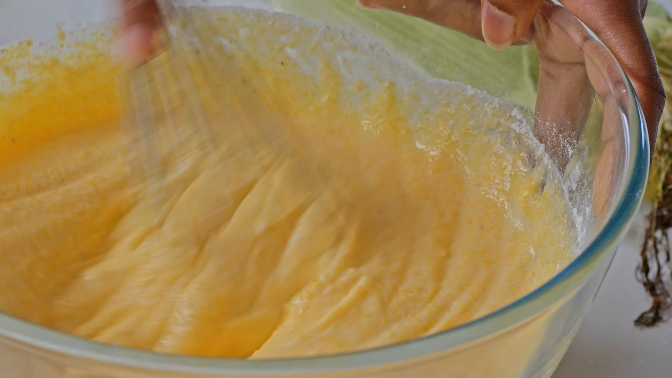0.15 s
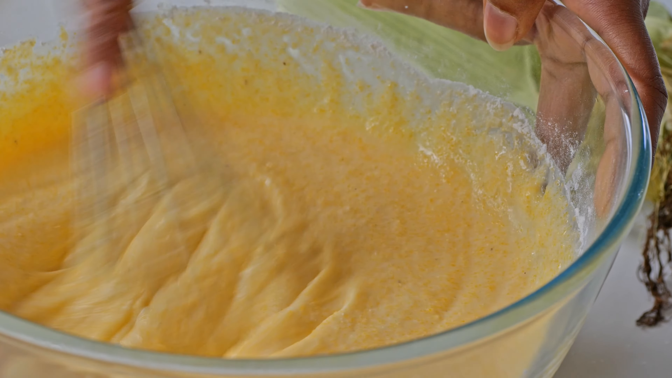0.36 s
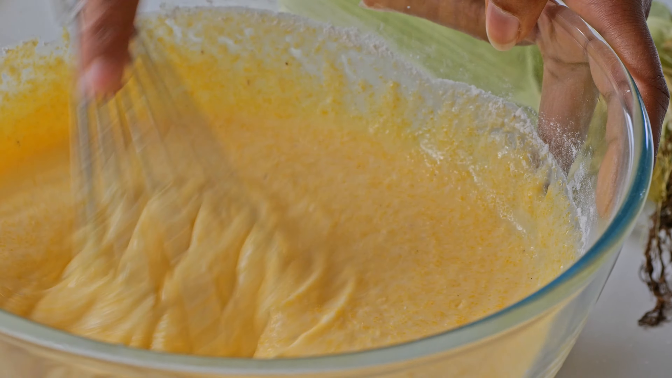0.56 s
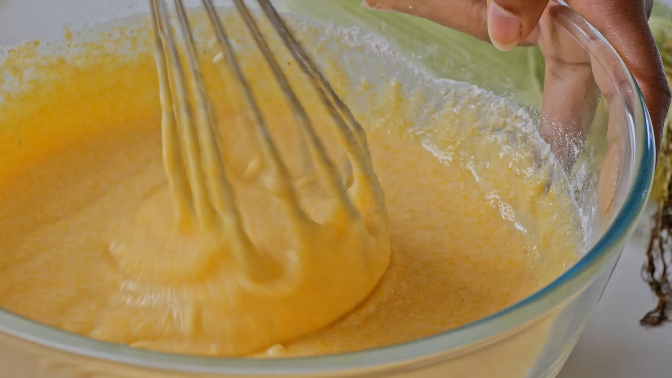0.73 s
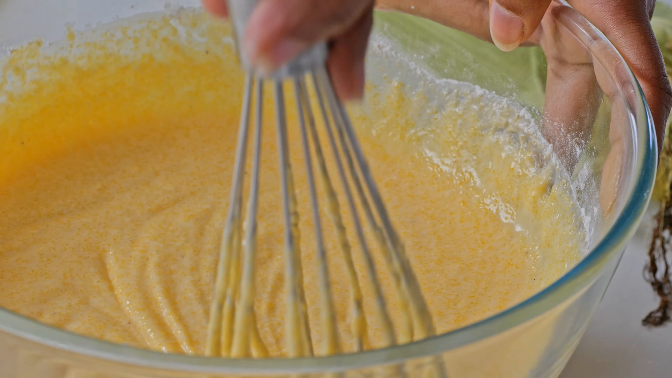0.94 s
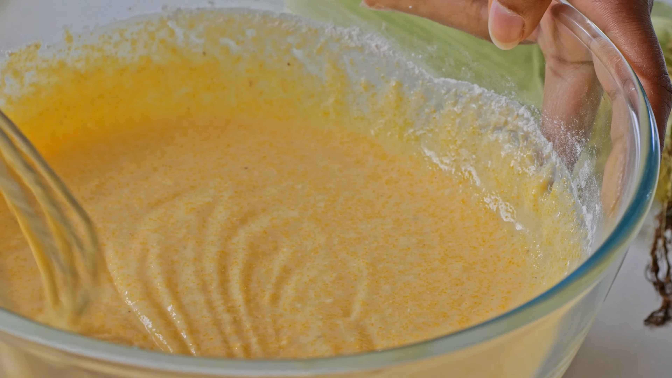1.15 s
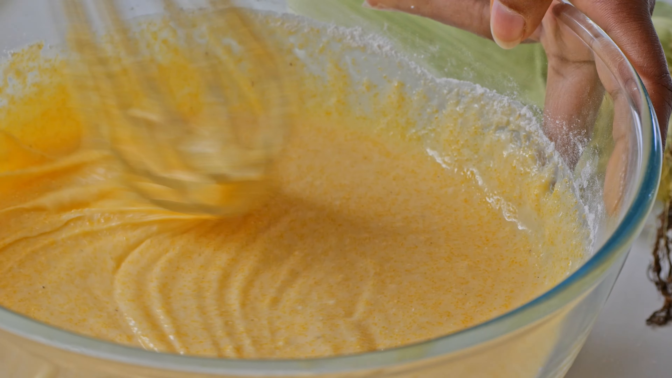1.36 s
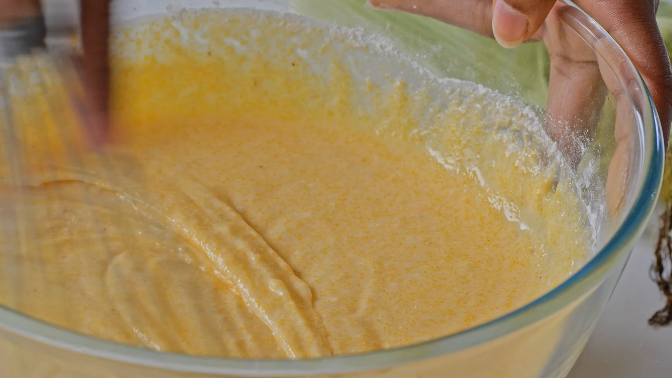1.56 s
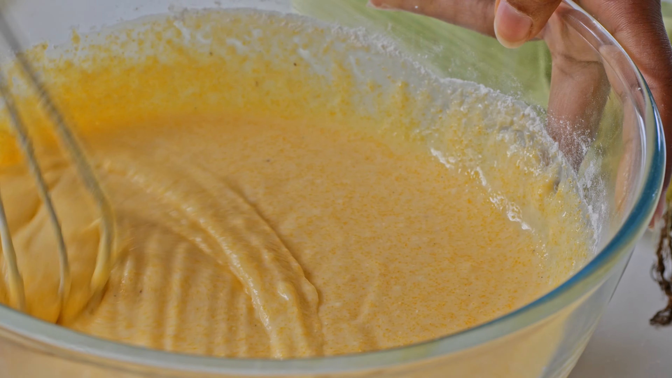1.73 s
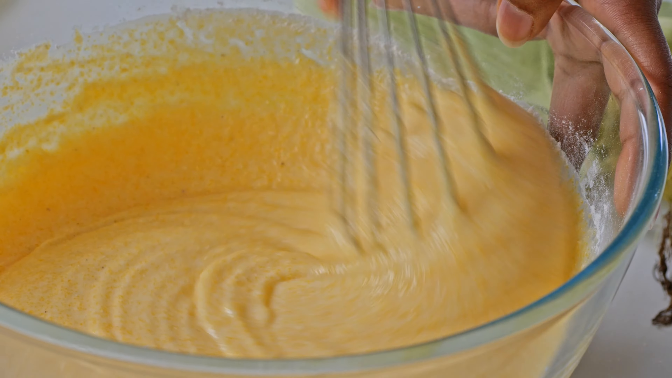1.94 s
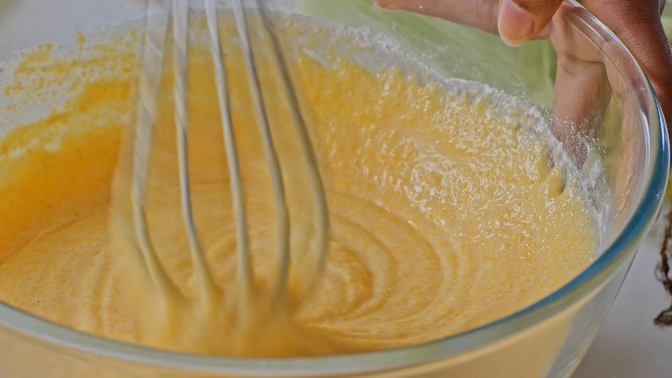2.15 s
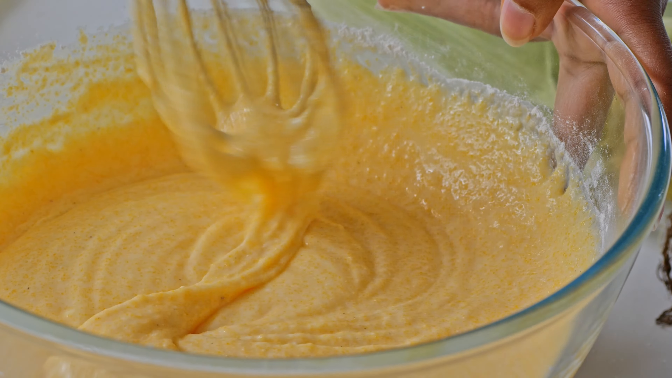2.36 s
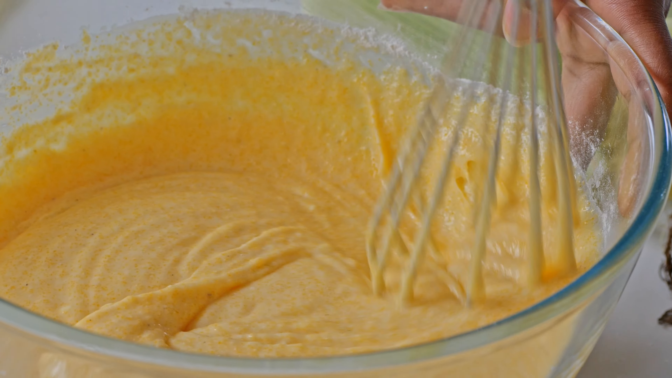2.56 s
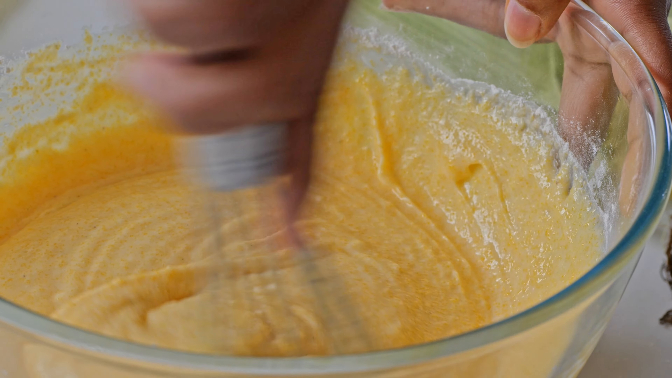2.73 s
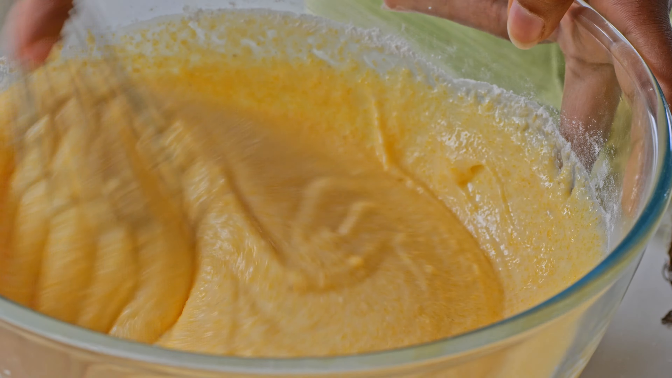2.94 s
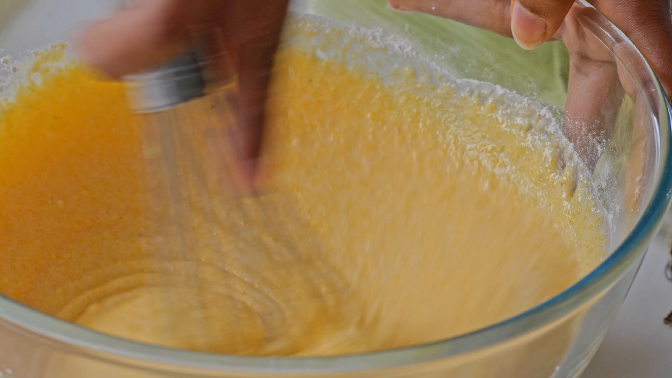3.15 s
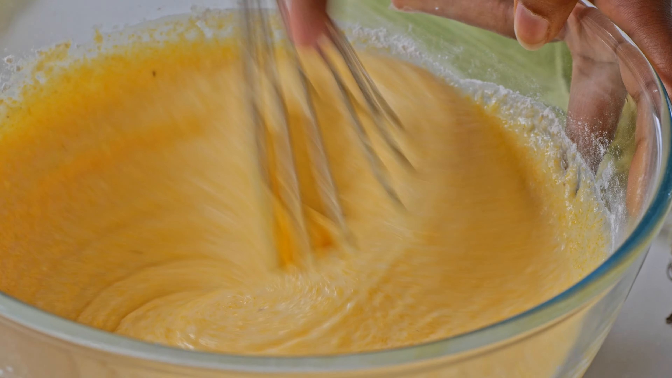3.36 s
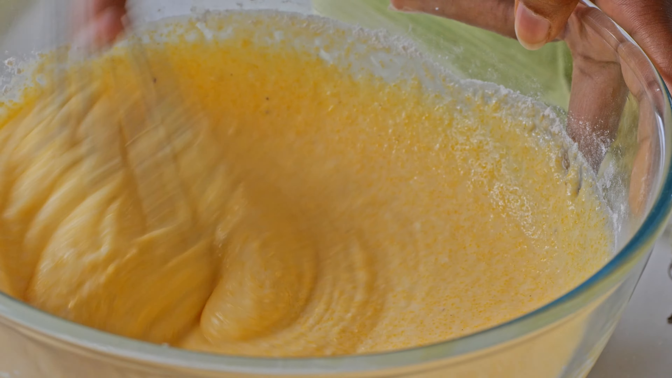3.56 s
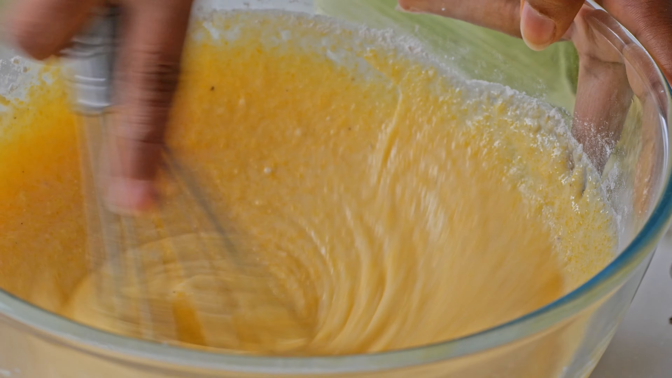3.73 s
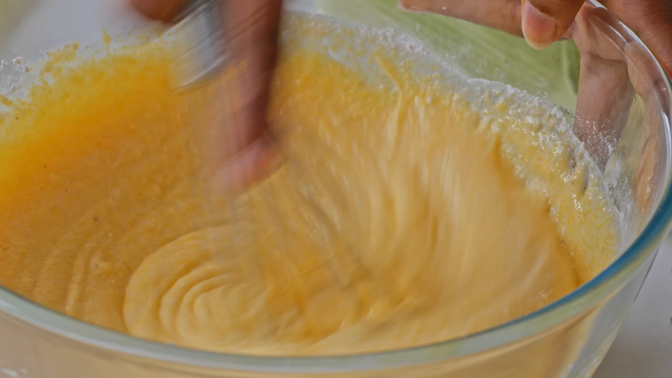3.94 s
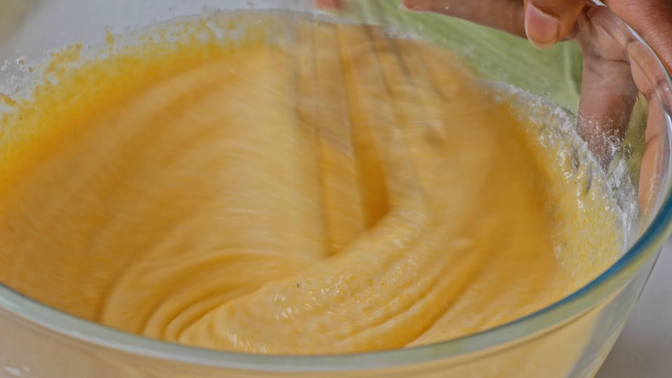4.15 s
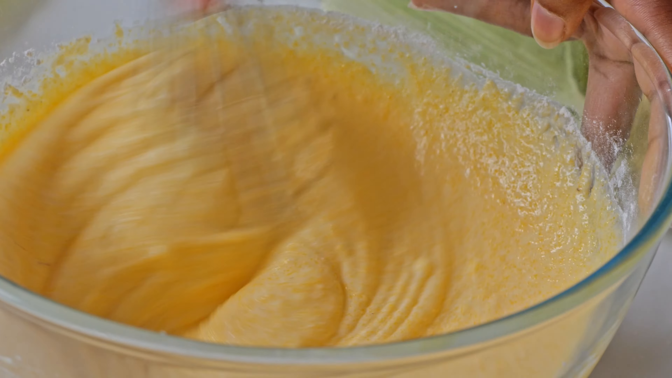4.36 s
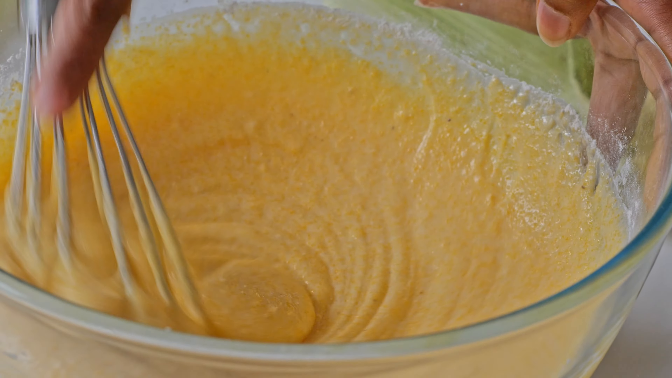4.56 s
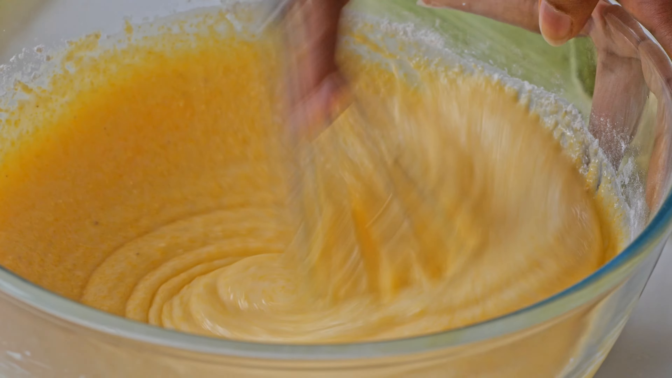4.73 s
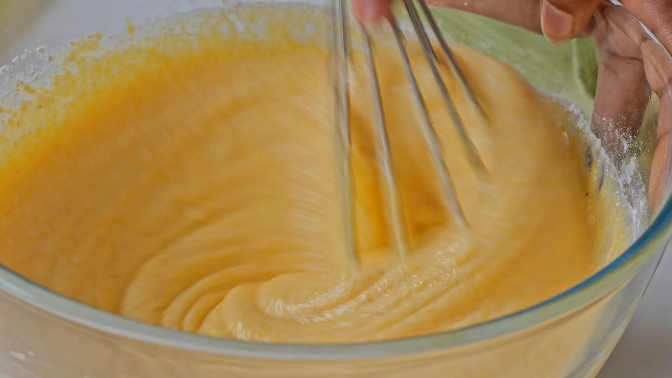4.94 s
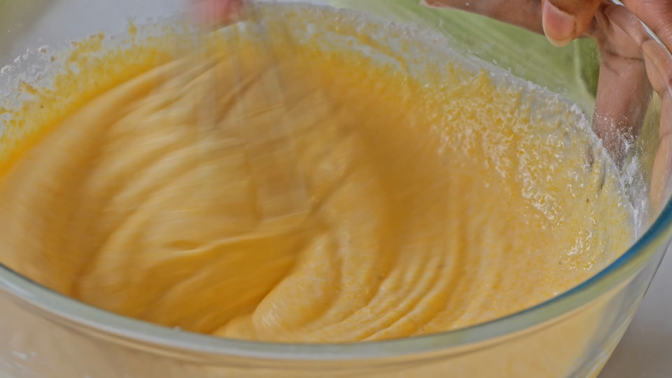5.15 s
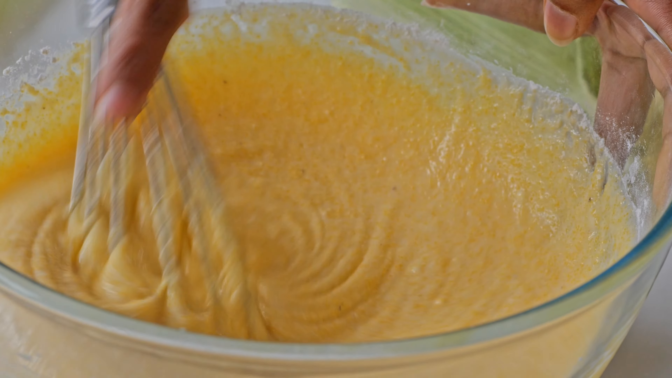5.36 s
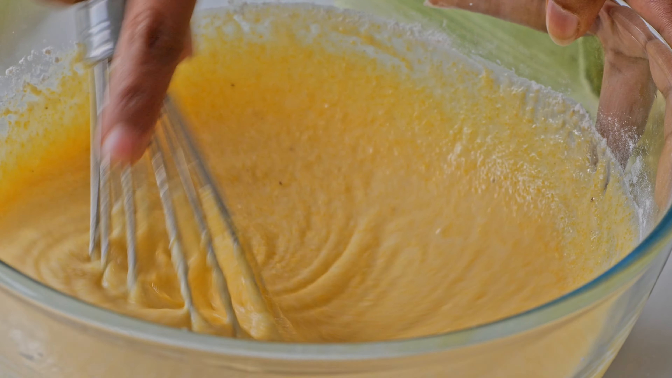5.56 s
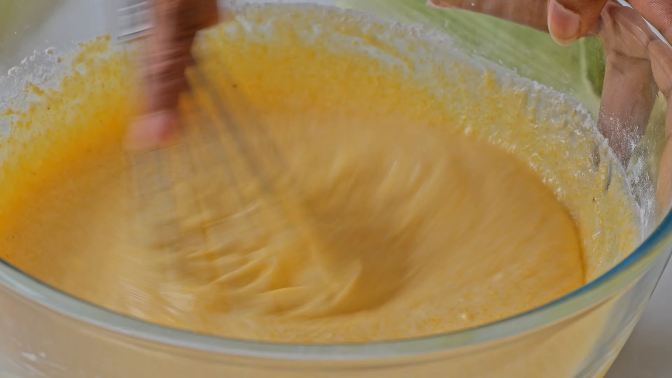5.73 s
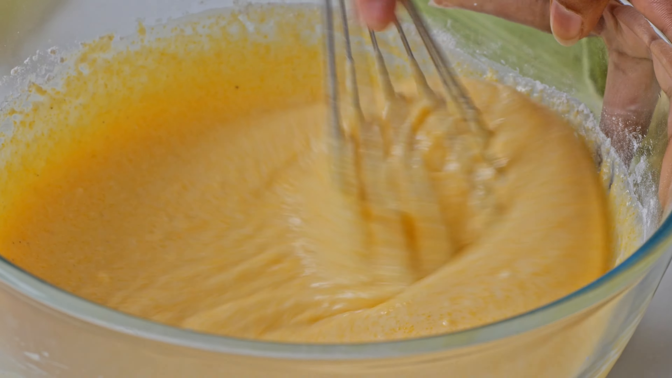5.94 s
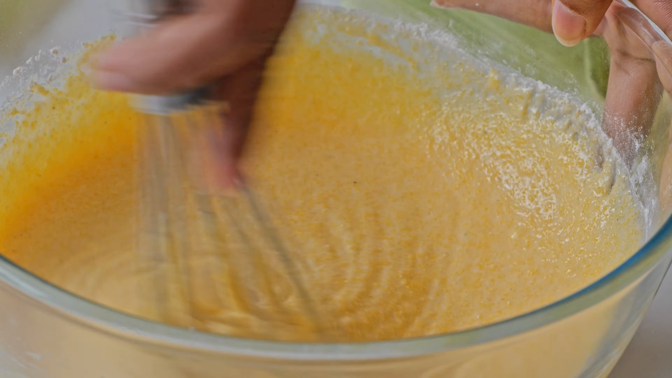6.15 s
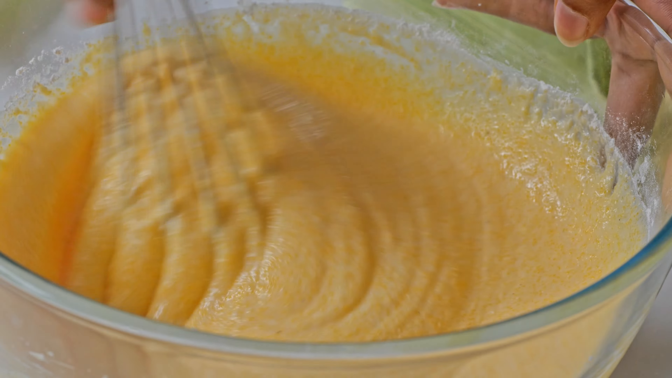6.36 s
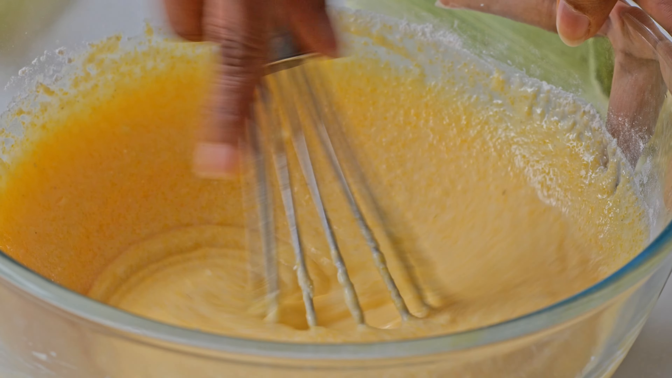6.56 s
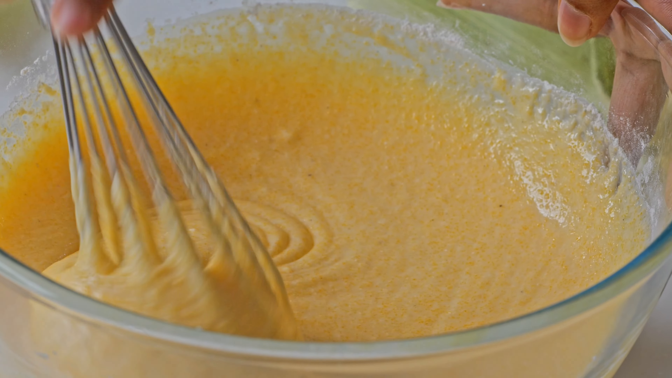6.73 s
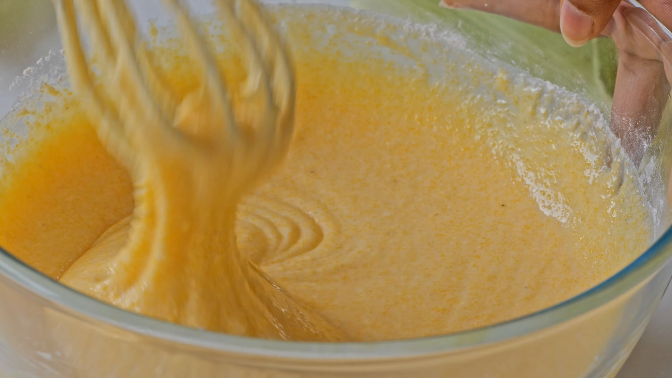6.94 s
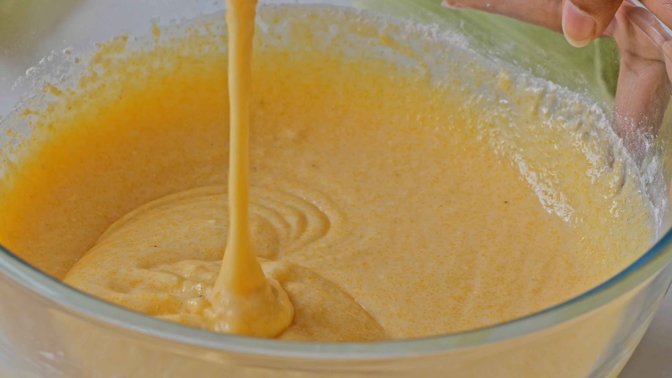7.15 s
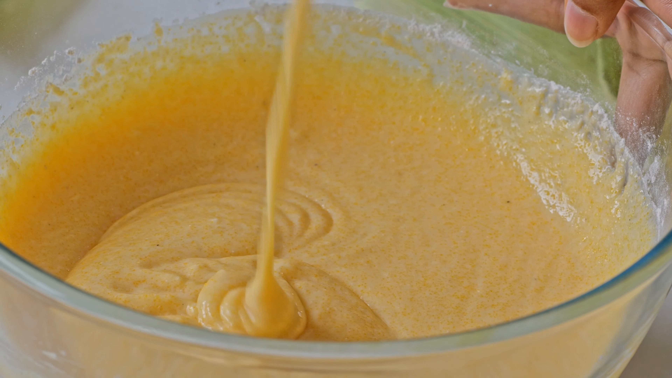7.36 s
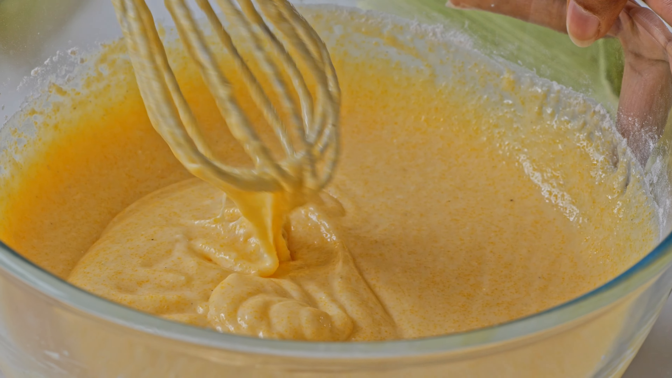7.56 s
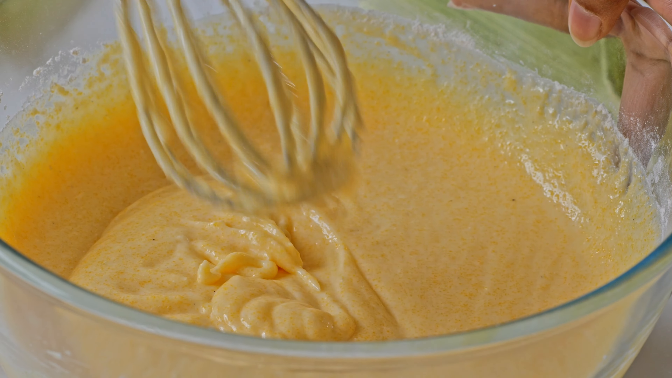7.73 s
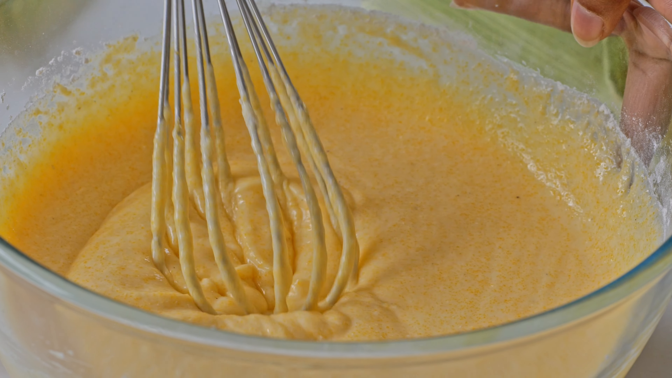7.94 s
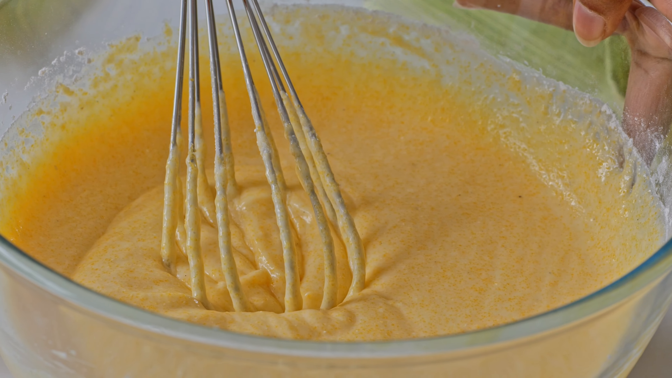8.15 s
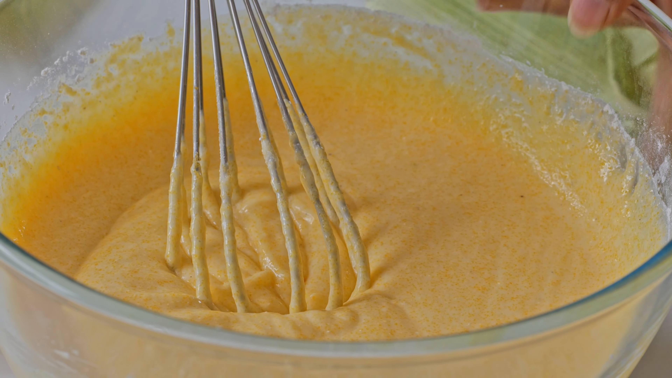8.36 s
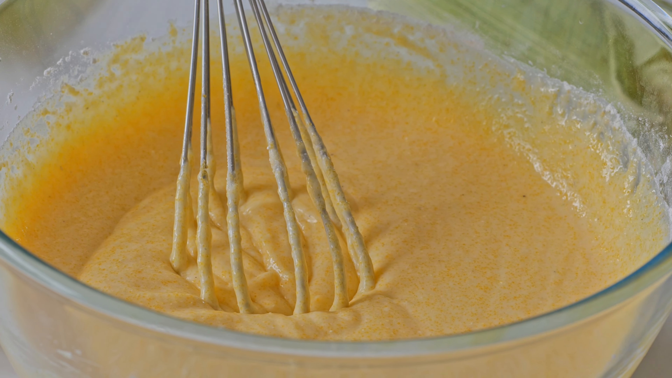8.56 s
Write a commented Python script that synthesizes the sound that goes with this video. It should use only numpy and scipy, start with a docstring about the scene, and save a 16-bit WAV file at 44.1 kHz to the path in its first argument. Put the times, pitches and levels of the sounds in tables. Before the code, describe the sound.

A wire whisk stirs thick batter softly in a glass bowl, close by, over the low hush of a slightly echoing kitchen. There are scattered dull bumps and light clinks, with a sharper knock and scrape on the glass at about 1.6 seconds. Around 3 seconds the churning gets wetter and stronger. From 3.5 to 6 seconds the whisk beats steadily, nearly four strokes a second: wires knock, skid and tick while the batter plops, squelches and crackles stickily, loudest just before 6 seconds. The whisk then slows to soft stirring with a couple of bumps near 6.5 seconds. Wires snap together with a plop at 7.5 seconds, and a knock with a slight clink follows at 8. Fingers brush softly off the rim at about 8.5 seconds. From about 4.5 seconds on, a distant bird whistles and chirps very faintly.

```python
"""Thick batter churns softly over the hush of a bare, echoing kitchen, stirred with a wire whisk.
The whisk knocks through it on a hand-held glass bowl; its wires skid on the wall, clink on bare glass
and snap together. The stirring grows into steady beating: bubbles squelch, air pockets plop, sticky
batter peels away and caught wires tick free. A faint bird whistles and chirps in the distance.
The whisk slows again, and at the end fingers slide off the rim."""
import sys
import numpy as np
from scipy import signal
from scipy.fft import rfft, irfft, next_fast_len
from scipy.io import wavfile
from scipy.ndimage import map_coordinates

SR = 44100
rng = np.random.default_rng(int(sys.argv[2]) if len(sys.argv) > 2 else 0)


def put_to_file(sound):
    """Save the sound as 16-bit audio at rate SR, in the file named by the first command-line argument."""
    columns = np.atleast_2d(sound).T  # one column per channel
    safe = np.clip(columns, -1, 1)
    whole_steps = np.round(safe * 32767)
    wavfile.write(sys.argv[1], SR, whole_steps.astype(np.int16))


N = 379260

# how long the kitchen echoes (t60 is the time to fade by 60 dB): f/Hz, t60/s
ECHO_TIMES = [(120, 0.19), (400, 0.83), (1000, 0.65), (3000, 0.61), (8000, 0.51), (15000, 0.11)]
# how much left and right differ: f/Hz, side level/dB
STEREO_WIDTH = [(30, -5), (70, -31), (170, -95), (300, -29.5), (650, -13.5), (1400, -4.5), (2800, -4.5),
                (6000, -7.5), (10000, -13.5), (14000, -0.5)]
# tone of the quiet room: f/Hz, level/dB
HUSH_TONE = [(15, -67), (25, -43.5), (141, -11), (291, -11), (324, -3), (527, -12.5), (587, 0.5),
             (637, -11), (1120, -16), (1220, -15.5), (1780, -22), (5370, -27), (6850, -26), (9720, -25.5),
             (15800, -36.5)]
# how hard the batter is stirred: t/s, churn level/dB, fizz level/dB
STIRRING = [(0.0, -60.5, -88), (1.0, -76, -70), (1.09, -64, -62.5), (1.24, -59.5, -55), (1.4, -74, -81),
            (1.8, -62.5, -57.5), (2.2, -66, -76), (2.99, -59.5, -61), (3.07, -48, -54.5),
            (3.22, -53.5, -62), (3.5, -52, -59.5), (4.55, -45.5, -58.5), (5.299, -49, -61.5),
            (5.55, -46, -52.5), (5.85, -39.5, -60), (6.2, -58, -63.5), (6.55, -61.5, -60), (6.9, -65, -78),
            (8.25, -59, -67), (8.6, -63, -76)]
# tone of folding batter: f/Hz, level/dB
CHURN_TONE = [(29, -54), (50, -43), (140, 0.5), (209, -0.5), (376, 2), (542, -12), (594, 0), (906, -8),
              (1790, -18), (2030, -18), (2180, -20.5), (4000, -33.5), (5200, -29), (8800, -120)]
# tone of tiny bubbles tearing open: f/Hz, level/dB
FIZZ_TONE = [(1180, -19), (2000, -1.5), (2800, -4.5), (3140, -3), (5950, -3), (11400, -0.5), (14400, -4),
             (15800, -21)]
# pitches at which the full bowl rings: f/Hz, width/Hz, level/dB
BOWL_PEAKS = [(253, 16, 0.5), (440, 13, 0.5), (686, 15, -5), (777, 44, -3), (1160, 260, -0.5)]
# tone of a cushioned bump: f/Hz, level/dB
THUD_TONE = [(24, -104), (40, -48), (134, 3.5), (203, -6), (237, -3), (304, -8), (433, -5), (538, -9),
             (832, -11.5), (951, -6.5), (1400, -23), (1860, -27), (2200, -31), (2860, -79), (4840, -120)]
# single bumps before and after the beating: t/s, level/dB, low thump/dB, hard clack/dB, gulp f/Hz
BUMPS = [(1.002, -47.5, -10, -7, 354), (1.564, -34.5, 10, 12, 910), (1.958, -50, -11, 3.5, 675),
         (2.506, -43.5, -2.5, 1, 318), (3.012, -45.5, -4, -9, 333), (3.145, -37, -2.5, -11, 424),
         (6.467, -44, -14, -8.5, 810), (6.572, -47, -9, 0, 368), (7.49, -37, -16, -4.5, 603),
         (8.007, -29, -6.5, -2.5, 700)]
# the beating whisk hits the bowl once a turn: t/s, level/dB, low thump/dB, hard clack/dB, gulp f/Hz
STROKES = [(3.512, -30.5, -3, -3.5, 570), (3.758, -33.5, 5, -10, 450), (4.032, -35.5, -3, 0.5, 578),
           (4.299, -32, 4.5, -3.5, 157), (4.568, -26, 3.5, -5, 340), (4.821, -40, 3, -13, 613),
           (5.103, -32.5, 7, -2.5, 607), (5.343, -27, -22, -3, 950), (5.577, -24, -25, -8, 997),
           (5.813, -22, -26, -2.5, 940)]
# wires skid on the wall: t/s, level/dB, treble/dB, zing f/Hz, length/s
SKIDS = [(1.004, -53.5, 1, 4600, 0.011), (1.5647, -33, -2.5, 4900, 0.013), (1.974, -52, -2, 7500, 0.023),
         (2.504, -52, -5, 9250, 0.015), (3.513, -36.5, 13, 10000, 0.0093), (3.546, -35.5, 6, 9700, 0.0074),
         (3.763, -43, 7, 11300, 0.011), (3.779, -37.5, 1, 9600, .01), (5.101, -43.5, 2, 9900, 0.012),
         (5.313, -39.5, 0, 3550, 0.012), (5.337, -30, -2, 10800, .02), (5.432, -35, 3, 8900, 0.031),
         (5.553, -36, -8, 11900, .022), (5.575, -24.5, 0.5, 3440, .021), (5.687, -30, 1.5, 5030, 0.023),
         (5.785, -30.5, -3, 12900, 0.036), (5.802, -24, -4, 3200, 0.018), (5.815, -24.5, -3.5, 3370, 0.014),
         (5.906, -37.5, 6, 3430, .024)]
# tone of steel sliding on glass: f/Hz, level/dB
RASP_TONE = [(710, -21.5), (1200, 6), (1470, -12), (1830, -7), (2470, -13.5), (3340, -11.5), (5260, -7.5),
             (6670, -9.5), (7750, -10), (12600, -4), (15800, -11.5)]
# pitches at which the wire loops ring: f/Hz, width/Hz, level/dB
WIRE_PEAKS = [(1845, 58, 2), (3230, 370, -2.5), (3720, 84, 2), (5220, 640, 0.5), (7840, 650, 3.5),
              (9850, 410, 0), (12260, 300, 0.5), (13800, 150, -7)]
# a wire hits bare glass: t/s, level/dB, low tones/dB, hardness/dB, chime near 4.8 kHz/dB
CLINKS = [(1.008, -63.5, -12, -14, -4), (1.204, -61, 0, 10, 6), (1.237, -66, 2, 4, -2),
          (1.567, -34, -1, -0.5, -2), (1.89, -59.5, 4, 5, -9), (8.006, -46.5, -7.5, -8, -26)]
# tones of the freely ringing bowl: f/Hz, level/dB, t60/s
GLASS_MODES = [(367, -2, 0.049), (957, -6.5, 0.061), (1590, 3.5, 0.045), (1805, -7, 0.062),
               (2286, -2, 0.021), (2510, 1.5, 0.04), (3500, -2, 0.033), (3583, 0, 0.048), (4790, 3, 0.034),
               (4840, -1, 0.022), (6240, -8, 0.048), (7780, -5, 0.02), (9420, -9, 0.027),
               (9430, -10, 0.046)]
# two wires snap together: t/s, level/dB
SNAPS = [(2.5055, -42.5), (3.514, -49), (3.76, -40), (5.106, -34.5), (7.4916, -27), (7.891, -46),
         (8.064, -51)]
# batter squeezes through the wires: t/s, level/dB, f/Hz, rise/s
SQUELCHES = [(2.985, -57, 1690, 0.0071), (3.032, -53, 1500, 0.0049), (3.149, -40.5, 950, 0.0042),
             (3.19, -47.5, 920, 0.0077), (3.502, -42, 1020, 0.0046), (3.369, -51, 1650, 0.0075),
             (3.4, -58, 1800, 0.026), (3.547, -37.5, 1030, .005), (3.657, -43, 1740, .003),
             (3.78, -44, 1090, 0.0035), (3.912, -50, 1700, 0.0064), (4.435, -46.5, 1610, .02),
             (4.968, -40, 1420, 0.0029), (6.465, -42, 880, 0.0074)]
# air pockets close behind the wires: t/s, level/dB, f/Hz, low thump/dB
PLOPS = [(3.036, -45.5, 300, 0), (3.26, -50, 394, -2), (3.372, -46, 323, -4), (3.46, -39.5, 290, 2),
         (3.501, -35.5, 578, -1), (3.59, -34.5, 368, -9), (3.657, -41, 344, -22), (3.789, -32, 436, -7.5),
         (3.916, -36, 884, -9), (3.97, -34.5, 350, 2), (4.062, -37.5, 380, 5), (4.177, -56, 247, 0),
         (4.329, -37, 332, 7), (4.393, -43, 367, -7), (4.451, -40, 344, -7), (4.623, -34, 800, -10),
         (4.713, -42.5, 482, -13), (4.769, -37.5, 343, -4), (4.971, -35, 314, -10.5),
         (5.029, -39, 584, -14), (5.131, -44, 377, 3), (5.232, -36.5, 340, -22), (5.283, -36.5, 380, -10),
         (5.312, -28, 390, -5), (5.451, -40, 940, -17), (5.552, -29, 957, -15), (5.583, -29, 270, -12),
         (5.821, -29.5, 268, -7), (7.495, -41, 267, -8)]
# sticky batter peels off the wires: t/s, level/dB, f/Hz, rise/s
PEELS = [(3.375, -59, 11000, .008), (3.44, -51, 11500, .009), (3.965, -49.5, 9500, 0.0053),
         (4.0, -51.5, 11000, .016), (4.055, -52, 9500, 0.0084), (4.174, -53, 12300, 0.0037),
         (4.286, -50, 10700, 0.0032), (4.506, -48, 12300, 0.0063), (4.622, -46.5, 10500, .004),
         (4.711, -53, 11000, 0.0054), (4.764, -49.5, 11400, 0.0047), (4.825, -55, 12000, 0.0043),
         (4.861, -45, 9400, 0.0037), (4.99, -45, 9000, 0.0058), (5.226, -50, 11200, .005),
         (5.28, -49, 10500, 0.0047), (5.364, -40, 10000, 0.0057), (5.946, -52, 10000, 0.0064),
         (6.1, -51.5, 11100, .005), (6.425, -53, 12000, 0.0042), (6.47, -53, 10000, .008),
         (6.652, -55, 12000, .009)]
# a caught wire springs free: t/s, level/dB, f/Hz
TICKS = [(3.516, -42, 1970), (3.548, -37, 1900), (3.657, -47, 1650), (3.78, -43, 2050), (3.801, -42, 2000),
         (3.909, -47, 1800), (4.036, -49, 2010), (4.064, -43, 2020), (4.109, -49, 2300), (4.179, -54, 2060),
         (4.331, -46.5, 1960), (4.474, -52, 1500), (4.624, -47.5, 1670), (4.714, -41, 1660),
         (4.865, -42.5, 2000), (4.971, -46, 1570), (5.344, -34.5, 1965), (5.58, -32.5, 1960),
         (5.82, -32, 1880)]
# overtones of a damped wire loop: f/Hz, level/dB, t60/s
LOOP_MODES = [(3100, -8, 0.049), (3840, -13.5, 0.039), (5080, -11, 0.031)]
# the bird's plain notes: t/s, length/s, start f/Hz, end f/Hz, level/dB
WHISTLES = [(4.423, 0.06, 2060, 2070, -79), (4.513, 0.11, 2058, 2069, -75.5),
            (4.674, 0.031, 2048, 2050, -68.5), (4.819, 0.097, 2065, 2094, -71.5),
            (5.225, 0.022, 2170, 2410, -72), (5.382, 0.093, 2380, 2220, -71),
            (6.704, 0.107, 2375, 2622, -75.5), (6.77, 0.013, 2340, 1750, -70),
            (8.403, 0.012, 2580, 1610, -69)]
# the bird's run of falling calls: t/s, level/dB, pitch ratio, length ratio
CHIRPS = [(7.015, -80, 0.94, 1.08), (7.305, -80, 1, 0.95), (7.605, -81, 0.95, 0.86),
          (7.9, -73.5, 0.93, 0.8), (8.21, -81, 0.96, 0.81)]
# the pitch of one falling call: t/s, f/Hz
CHIRP_GLIDE = [(0, 3700), (0.016, 3525), (0.03, 3435), (.04, 2666), (.07, 2543), (.08, 2094), (0.1, 1860)]
# the hand slides off the rim: t/s, level/dB
HAND_SLIDE = [(8.4, -83), (8.515, -68), (8.534, -55.5), (8.6, -71)]
# tones of a snap, a squelch, a tick's crack and rubbing skin: f/Hz, level/dB
SNAP_TONE = [(300, -34), (2000, 0), (8000, -4.5), (10500, 8), (15000, 1)]
SQUELCH_TONE = [(200, -21), (900, 5), (2000, -11), (5000, -14.5)]
CRACK_TONE = [(500, -34), (1500, -3), (5000, -6), (14000, -16)]
SKIN_TONE = [(500, -13), (2000, -3), (7000, -4), (11000, -4.5), (15000, -17)]

HUSH_DB, CHURN_DB, FIZZ_DB = -66.17, -10.5, -14
SURGE_DB, BUILD_DB = 3, 3.5  # the churning swells, and builds up towards the next stroke
AFTER_DB, AFTER_T60_S, BEAT_HZ = -14, 0.4, 19  # the glass's weak after-ring and its typical pulse rate
BUBBLE_T60_S, TICK_T60_S, TICK_CRACK_DB = 0.0044, 0.045, -5.5
SLAP_RISE_S, PLOP_T60_S, PLOP_RISE_PER_S = 0.0047, 0.049, 1.7
TOP_HZ = 15850
T = np.arange(SR) / SR  # one second of time, for single sounds


def amp(db):
    """Turn decibels into a gain."""
    return 10 ** (np.asarray(db) / 20)


def unit(x):
    """Scale to an average (rms) level of 1."""
    return x / np.sqrt(np.mean(x ** 2) + 1e-20)


def struck(x, db):
    """Set the average (rms) level of a sound's first 30 ms."""
    return amp(db) * x / np.sqrt(np.mean(x[..., :round(.03 * SR)] ** 2))


def along(points, hz):
    """Read between (Hz, value) points on a logarithmic pitch scale."""
    f, value = np.transpose(points)
    return np.interp(np.log(hz + 1), np.log(f + 1), value)


def add(track, s, x):
    """Mix x into the track at s seconds."""
    start = max(round(s * SR), 0)
    track[..., start:start + x.shape[-1]] += x[..., :N - start]


def coloured(x, gain):
    """Filter x by gain(Hz), so that nothing rings before the sound that causes it."""
    n = x.shape[-1]
    m = 2 * next_fast_len(n // 2 + 4096)
    cepstrum = irfft(np.log(np.maximum(gain(np.fft.rfftfreq(m, 1 / SR)), 1e-6)), m)
    cepstrum[1:m // 2] *= 2  # move the filter's early half to after the sound
    cepstrum[m // 2 + 1:] = 0
    return irfft(rfft(x, m) * np.exp(rfft(cepstrum)), m)[..., :n]


def body(tone, peaks, ring_db, hz):
    """Gain of a broad tone with ringing peaks standing out of it."""
    ring = sum(amp(db) ** 2 / (1 + (2 * (hz - f) / width) ** 2) for f, width, db in peaks)
    return amp(along(tone, hz)) * np.sqrt(1 + amp(ring_db) ** 2 * ring)


def hump(hz, centre_hz, width, height_db):
    """Gain of one extra peak; its width is a share of its frequency."""
    return amp(height_db / (1 + ((hz / centre_hz - 1) / width) ** 2))


def wobble(rate):
    """A smooth curve through rate random points a second."""
    return map_coordinates(rng.standard_normal(int(N * rate / SR) + 4), [np.arange(N) * rate / SR])


def grains(rate, spread_db, size):
    """About rate random clicks a second, some weak and some strong."""
    clicks = (rng.random(size) < rate / SR) * rng.standard_normal(size)
    return clicks * amp(spread_db * np.clip(rng.standard_normal(size), -2, 2))


def stereo(pair):
    """Two unrelated signals become one wide sound, with the bass near the middle."""
    side = coloured(pair[1], lambda hz: amp(along(STEREO_WIDTH, hz)))
    return np.array([pair[0] + side, pair[0] - side])


def kitchen(x, wet_db):
    """The direct sound plus its echo from the hard walls, at the level wet_db."""
    hz, t, noise = signal.stft(rng.standard_normal((2, SR)), SR, nperseg=256)
    fade = amp(-60 * t / along(ECHO_TIMES, hz)[:, None])
    tail = signal.istft(noise * fade, SR, nperseg=256)[1][:, :SR]
    tail = stereo(tail * (1 - np.exp(-T / 0.00043)))
    echo = signal.fftconvolve(x[None], tail / np.linalg.norm(tail[0]), axes=1)[:, :len(x)]
    return x + amp(wet_db) * echo


def hush():
    """Steady room noise, strongest in the low middle."""
    air = coloured(rng.standard_normal((2, N)), lambda hz: amp(along(HUSH_TONE, hz)))
    return amp(HUSH_DB) * unit(stereo(air))


def bubbles(times, spread_db, top_hz, size):
    """Tiny bubbles burst at the given times, each with its own pitch and strength."""
    t = T[:300]
    pitch, strength = rng.random((len(times), 2)).T
    hz = top_hz * (0.04 + 0.96 * pitch[:, None])
    pops = amp(spread_db * strength[:, None] ** 3) * np.sin(2 * np.pi * hz * t)
    pops *= amp(-60 * t / BUBBLE_T60_S)
    at = (times * SR).astype(int)[:, None] + np.arange(len(t))
    return np.bincount(at.ravel(), pops.ravel(), size)[:size]


def surge(t):
    """Level change in dB while beating: two swells a turn, on top of a rise towards its end."""
    starts = np.array(STROKES)[:, 0]
    turn = np.interp(t, starts, np.arange(len(starts))) % 1
    return SURGE_DB * np.sin(2 * np.pi * 2 * turn) + BUILD_DB * turn ** 2


def batter():
    """Folding batter plops in clumps, and small bubbles crackle on its surface."""
    s, churn_db, fizz_db = np.transpose(STIRRING)
    t = np.arange(N) / SR

    def effort(db, floor_db):
        """Gain that follows the stirring and is silent below the floor."""
        return np.sqrt(np.maximum(amp(np.interp(t, s, db)) ** 2 - amp(floor_db) ** 2, 0))

    clumps = amp(2.5 * wobble(25)) * grains(600, 2.15, size=N)
    folds = unit(coloured(clumps, lambda hz: body(CHURN_TONE, BOWL_PEAKS, 1.5, hz)))
    foam = bubbles(rng.uniform(0, N / SR, size=18000), spread_db=12.5, top_hz=15300, size=N)
    foam *= amp(3.3 * wobble(45))
    crackle = unit(coloured(foam, lambda hz: amp(along(FIZZ_TONE, hz)) * (hz > 300)))
    churn = kitchen(folds * amp(surge(t)) * effort(churn_db, floor_db=-65), wet_db=0.5)
    fizz = kitchen(crackle * effort(fizz_db, floor_db=-79), wet_db=3.5)
    return amp(CHURN_DB) * churn + amp(FIZZ_DB) * fizz


def knocks(blows):
    """Batter cushions each bump; the full bowl answers dully and the hollow behind the whisk gulps."""
    out = np.zeros((2, N))
    u = T / 0.0034
    push = u * np.exp(-u) + 0.18 * amp(-60 * T / 0.091)
    for s, db, thump_db, clack_db, gulp_hz in blows:
        force = grains(5000, 4.3, size=SR) * push  # the wires land one after another
        softness = [(130, thump_db), (260, -0.21), (550, 0.15), (1000, clack_db)]
        thud = coloured(force, lambda hz: body(THUD_TONE, BOWL_PEAKS, 0.62, hz)
                        * amp(along(softness, hz)) * hump(hz, gulp_hz, width=0.091, height_db=11.5))
        add(out, s, struck(kitchen(thud, wet_db=3), db - 10))
    return out


def skids():
    """Wires stick and slip in tiny clicks that ring the loops; the loop that is caught zings most."""
    out = np.zeros((2, N))
    for s, db, treble_db, zing_hz, length in SKIDS:
        u = T / length
        edge = [(100, -59), (700, -3), (3000, 4), (11000, treble_db)]
        foam = bubbles(rng.uniform(0, .1, size=900), spread_db=10, top_hz=15680, size=SR)
        slips = (struck(grains(9000, 1.6, size=SR), 0) + struck(foam, -1.7)) * u ** 2 * np.exp(-5 * u)
        rasp = coloured(slips, lambda hz: body(RASP_TONE, WIRE_PEAKS, 5.6, hz)
                        * amp(along(edge, hz)) * hump(hz, zing_hz, width=0.028, height_db=9))
        start = s - .13 * length  # the rubbing starts just before it bites
        add(out, start, struck(kitchen(rasp, wet_db=-1), db - 12.5))
    return out


def ringing(modes, touch, split):
    """Fading tones, as strong as the touch sets; a shape not quite round splits each into a pair."""
    t = T[:SR // 3]
    ring = sum(amp(db + along(touch, hz) - 60 * t / t60) * np.sin(2 * np.pi * hz * (1 + side * split) * t)
               for hz, db, t60 in modes for side in (-1, 1))
    return np.pad(ring, (0, SR - len(t)))


def clinks():
    """Bare glass rings briefly, then pulses as it fades; a harder touch brings out the high tones."""
    out = np.zeros((2, N))
    attack = 1 - np.exp(-T / 0.002)
    for s, db, low_db, hard_db, chime_db in CLINKS:
        touch = [(1800, low_db), (2500, 0), (3600, hard_db / 2),
                 (4750, hard_db + chime_db), (6100, hard_db)]
        ring = ringing(GLASS_MODES, touch, split=0.0022) * attack
        after = np.zeros(SR)
        for hz, mode_db, _ in GLASS_MODES:
            if hz < 5000:
                tone = np.sin(2 * np.pi * (hz * T + rng.random()))
                pulse = 1 + 0.61 * np.cos(2 * np.pi * BEAT_HZ * T * rng.uniform(0.57, 1.39))
                after += amp(mode_db + along(touch, hz) - 60 * T / AFTER_T60_S) * tone * pulse
        add(out, s, struck(kitchen(ring, wet_db=10), db - 6.5) + struck(after * attack, db + AFTER_DB))
    return out


def snaps():
    """Steel on steel gives one very short, bright click."""
    out = np.zeros((2, N))
    for s, db in SNAPS:
        crack = rng.standard_normal(SR) * amp(-60 * T / 0.014) * (1 - np.exp(-T / 0.002))
        click = coloured(crack, lambda hz: amp(along(SNAP_TONE, hz)))
        add(out, s, amp(db) * kitchen(click / np.abs(click).max(), wet_db=-3))
    return out


def squelches():
    """Larger bubbles are squeezed out between the wires in a quick cluster."""
    out = np.zeros((2, N))
    for s, db, hz, rise in SQUELCHES:
        burst = bubbles(rise * rng.gamma(2, size=60), spread_db=8, top_hz=5100, size=SR)
        squeeze = coloured(burst, lambda f: amp(along(SQUELCH_TONE, f))
                           * hump(f, hz, width=0.31, height_db=18))
        add(out, s, struck(kitchen(squeeze, wet_db=-3.5), db - 13.5))
    return out


def plops():
    """Wires slap the batter; the air pocket behind them rings, rising in pitch as it closes."""
    out = np.zeros((2, N))
    u = T / SLAP_RISE_S
    fade = amp(-60 * T / PLOP_T60_S) * (1 - np.exp(-T / 0.003))
    for s, db, hz, thump_db in PLOPS:
        pocket = np.sin(2 * np.pi * hz * (T + PLOP_RISE_PER_S * T ** 2 / 2)) * fade
        softness = [(140, thump_db), (260, -3.5), (1000, -0.5)]
        force = grains(4000, 2.5, size=SR) * u * np.exp(-u)
        slap = coloured(force, lambda f: amp(along(THUD_TONE, f) + along(softness, f)))
        add(out, s, struck(kitchen(struck(pocket, -0.3) + struck(slap, 0), wet_db=1.5), db - 13.5))
    return out


def peels():
    """A film of batter tears in a short burst of fine, high crackle."""
    out = np.zeros((2, N))
    for s, db, hz, rise in PEELS:
        burst = bubbles(rise * rng.gamma(2, size=110), spread_db=14, top_hz=15530, size=SR)
        tear = coloured(burst, lambda f: amp(along(FIZZ_TONE, f)) * hump(f, hz, width=0.077, height_db=4))
        add(out, s, struck(kitchen(tear, wet_db=-3), db - 14.5))
    return out


def ticks():
    """A wire springs free with a small crack and pings for an instant."""
    out = np.zeros((2, N))
    for s, db, hz in TICKS:
        touch = [(2300, 0), (3200, rng.normal(0, 4.9))]
        ping = ringing([(hz, 0, TICK_T60_S), *LOOP_MODES], touch, split=0.013) * (1 - np.exp(-T / 0.0015))
        burst = rng.standard_normal(SR) * amp(-60 * T / 0.086)
        crack = coloured(burst, lambda f: amp(along(CRACK_TONE, f)))
        tick = struck(ping, 0) + struck(crack, TICK_CRACK_DB)
        add(out, s, struck(kitchen(tick, wet_db=-7), db - 15))
    return out


def note(glide, overtone_db, burr):
    """A soft-edged whistle along (s, Hz) points, with a weak octave and a fast warble."""
    s, hz = np.transpose(glide)
    t = T[T < s[-1]]
    warble = 1 + burr * np.sin(2 * np.pi * (85 * t + rng.random()))
    phase = 2 * np.pi * np.cumsum(np.interp(t, s, hz) * warble) / SR
    return signal.windows.tukey(len(t), .4) * (np.sin(phase) + amp(overtone_db) * np.sin(2 * phase))


def bird():
    """The bird is far off, so it arrives mostly as echo; no two calls fall quite alike."""
    song = np.zeros(N)
    flutter = amp(3 * wobble(40))
    for s, length, start_hz, end_hz, db in WHISTLES:
        add(song, s, amp(db) * note([(0, start_hz), (length, end_hz)], overtone_db=-24, burr=0.0071))
    for s, db, pitch, stretch in CHIRPS:
        glide = np.array(CHIRP_GLIDE) * [stretch, pitch]
        glide[:, 1] *= 1 + rng.normal(0, 0.0119, len(glide))
        add(song, s, amp(db) * note(glide, overtone_db=-9.5, burr=0.028))
    scattered = kitchen(song * flutter, wet_db=-8)[0]  # already blurred by other walls on its way in
    return kitchen(scattered, wet_db=13)


def hand():
    """Fingers brush the glass as they let go of the bowl."""
    s, db = np.transpose(HAND_SLIDE)
    rub = unit(coloured(grains(9000, 1.6, size=N), lambda hz: amp(along(SKIN_TONE, hz))))
    pressure = amp(np.interp(np.arange(N) / SR, s, db, left=-120) - 4)
    return kitchen(rub * pressure, wet_db=0.5)


def scene():
    """The bowl is just left of centre, with the bird and the room around it."""
    whisk = knocks(STROKES + BUMPS) + skids() + ticks() + snaps() + clinks()
    bowl = whisk + plops() + squelches() + peels() + batter() + hand()
    return bowl * amp([[.3], [-.3]]) + bird() + hush()


def record(dry):
    """Cut away everything above TOP_HZ."""
    m = next_fast_len(N + SR)
    return irfft(rfft(dry, m) * (np.fft.rfftfreq(m, 1 / SR) < TOP_HZ), m)[:, :N]


dry = scene()
out = record(dry)
put_to_file(out)
```